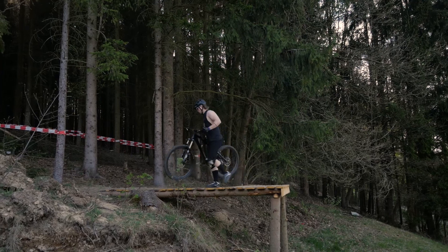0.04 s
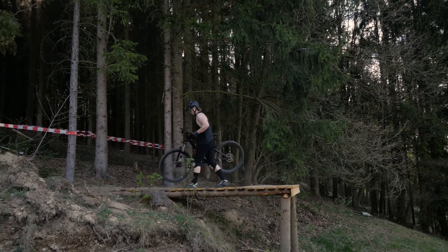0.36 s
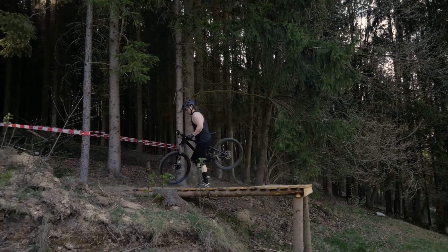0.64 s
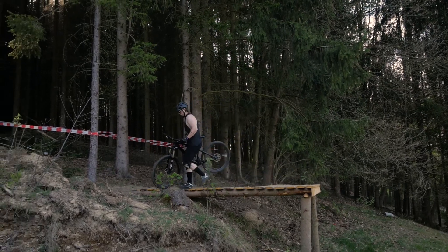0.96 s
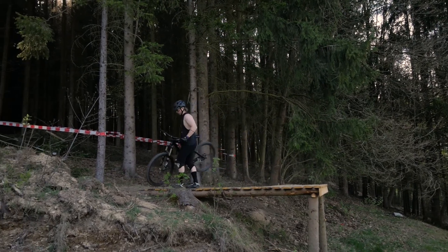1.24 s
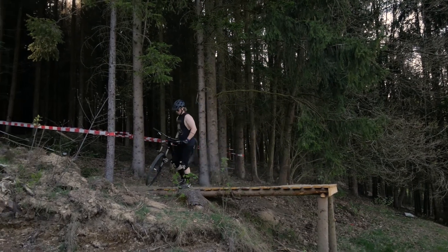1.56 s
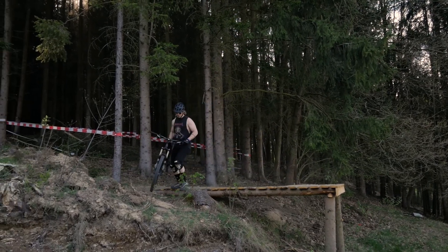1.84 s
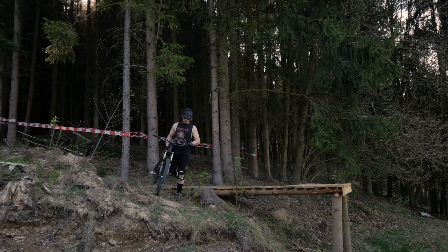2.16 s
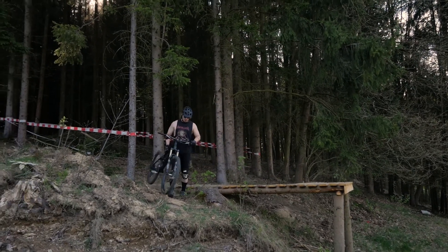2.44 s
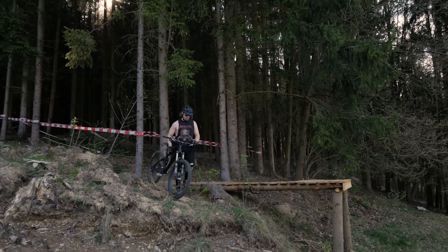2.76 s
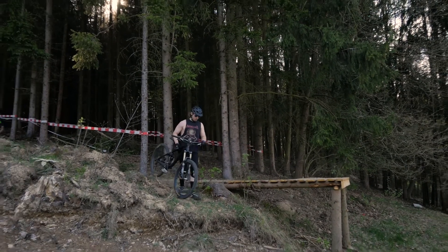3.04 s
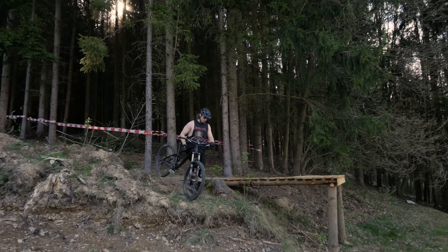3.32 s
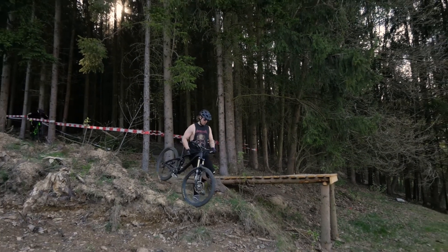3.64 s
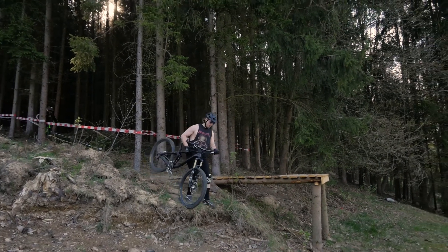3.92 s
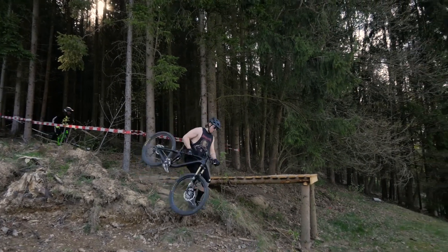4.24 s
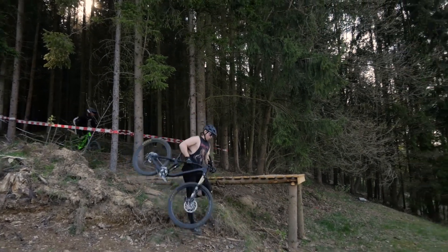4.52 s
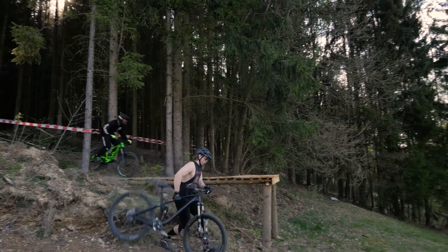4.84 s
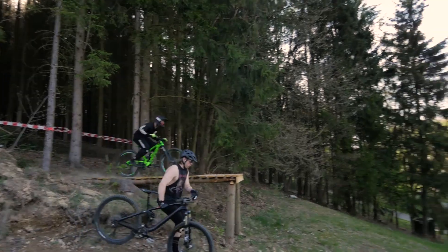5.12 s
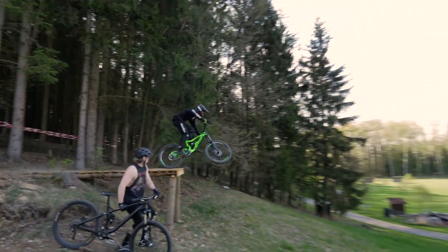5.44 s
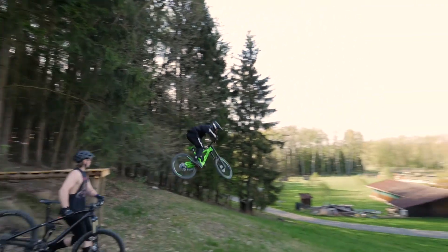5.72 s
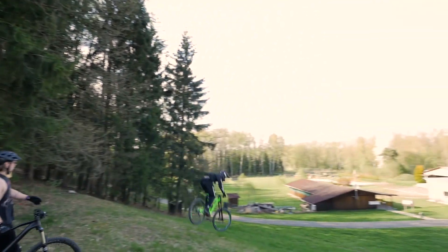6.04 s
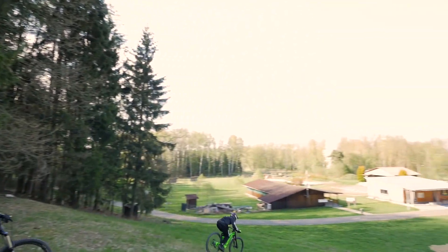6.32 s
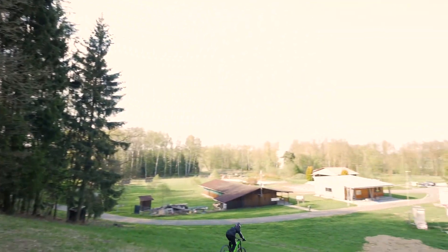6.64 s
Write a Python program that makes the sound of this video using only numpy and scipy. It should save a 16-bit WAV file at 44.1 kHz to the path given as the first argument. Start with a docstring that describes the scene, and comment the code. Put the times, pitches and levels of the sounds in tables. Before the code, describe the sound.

Faint birds whistle over a steady forest hush while shoes knock on wooden planks. A mountain bike is walked on through dry grass, clicking and rattling lightly. A second bike clatters in, drums across the hollow wooden ramp and flies off with its freewheel softly ticking. It lands on dirt with a thud and a short, loud buzz of tyre against frame, then rolls on. The bikes sound fairly near and almost dry, the birds distant.

```python
"""At a forest edge small birds whistle over a steady hush, and the trunks scatter a thin echo.
A mountain bike is walked off a wooden ramp: shoes knock on planks, the bike clicks, dry grass rustles.
A second bike rattles down the trail and, near 4.9 s, drums over the hollow deck.
It flies with its freewheel ticking and lands on dirt at 6.2 s, where a tyre buzzes briefly
against the frame as the suspension bottoms out."""
import sys
import numpy as np
from scipy import signal
from scipy.fft import rfft, irfft, next_fast_len
from scipy.io import wavfile
from scipy.ndimage import uniform_filter1d, map_coordinates

SR = 44100
rng = np.random.default_rng(int(sys.argv[2]) if len(sys.argv) > 2 else 0)


def bounce(signal):
    """Save signal as a 16-bit WAV file at the path given by the first command-line argument."""
    frames = np.transpose(np.atleast_2d(signal))
    limited = np.clip(frames, -1, 1)
    pcm = np.round(limited * 32767).astype(np.int16)
    wavfile.write(sys.argv[1], SR, pcm)


N = 303119

# Levels are mix trims; on resonances and spectra they only shape the tone.
# shoes and wheels on wood and hard ground: start_s, level_db, thump_db, brightness_hz, clatter_t60_s
KNOCKS = [(.364, -33.5, -16, 700, 0.14), (.3997, -26.5, -6.5, 1500, 0.044), (.877, -45, -2, 1410, .083),
          (.909, -37, -4, 1290, 0.099), (.932, -47, 11, 1100, .06), (1.033, -43.5, -2, 3000, .04),
          (1.3228, -28, -8.5, 1570, .075), (1.7132, -36, 0, 1770, .061), (1.794, -38, -18, 2470, 0.058),
          (2.535, -40.5, -10, 690, 0.02), (2.704, -35.5, -16, 3500, 0.2), (3.268, -48.5, 10.5, 800, .2),
          (3.603, -51, 14, 700, .06), (3.702, -48, 2, 1100, .073), (4.288, -39.5, -1, 600, .049),
          (4.339, -38, -5, 900, 0.036), (4.672, -25, 2, 704, 0.048), (4.789, -27.5, 3, 2210, 0.12),
          (4.908, -28.5, 4, 1770, 0.027), (4.94, -21, -5.5, 2000, 0.1), (4.998, -19.5, -19, 1560, 0.19),
          (5.094, -16.5, -26, 620, 0.0087), (5.387, -32, 1.5, 2200, 0.099), (5.426, -38.5, 8, 1790, .05),
          (5.538, -40.5, 8.5, 900, 0.23), (6.216, -33.5, 0, 595, 0.074), (6.227, -34, -2, 1470, 0.19),
          (6.251, -31.5, 3.5, 1390, .12)]
# chain, pedals and twigs: start_s, level_db, clack_db, t60_s
CLICKS = [(.029, -52.5, 2.5, .028), (0.787, -52, -20, .02), (.864, -53, -20, .02), (1, -44, -3, .012),
          (1.1915, -49.5, -1, 0.049), (1.791, -35, -13, 0.027), (2.3515, -48, -13, .032),
          (2.7036, -37.5, 3.5, 0.023), (2.7567, -32.5, -11, 0.014), (2.9023, -41.5, -1, .025),
          (2.9594, -36.5, -5, 0.013), (3.4573, -45, 5, 0.061), (3.6385, -38, 3, 0.0076),
          (3.7, -35.5, -1, 0.02), (3.7513, -42.5, 2, 0.043), (3.798, -48, -3, 0.022),
          (3.8524, -43.5, 2.5, .02), (3.8865, -40, -5, .047), (3.941, -36, -17, .034),
          (4.052, -37.5, -1, .006), (4.1732, -41, 3, 0.021), (4.2174, -30.5, -4, 0.0094),
          (4.247, -39.5, 1, .025), (4.3194, -41.5, 0.5, 0.052), (4.4194, -51, 9.5, 0.025),
          (4.488, -45.5, 5, 0.045), (4.653, -35, 4, 0.021), (4.6687, -29.5, -7.5, 0.072),
          (4.7457, -28.5, -18, 0.0095), (4.7924, -31, -0.5, 0.017), (4.7999, -24, -4.5, .025),
          (4.8877, -27.5, -9, .025), (4.9134, -22.5, -16, 0.013), (4.9401, -21.5, 4, 0.013),
          (4.9919, -21.5, -0.5, 0.056), (5.365, -36, 4, 0.046), (5.5653, -33, -10, .025),
          (5.727, -31.5, -18, 0.028), (6.2277, -26.5, -7, 0.071), (6.2748, -24, -2.5, 0.025),
          (6.318, -21.5, 1.5, 0.02), (6.567, -42.5, 1, .035)]
# short steel rings of the moving bike: start_s, pitch_hz, level_db, t60_s
PINGS = [(6.3, 8600, -58, 0.082), (5.333, 4170, -37, 0.065), (5.567, 2700, -45, 0.046),
         (5.65, 2560, -41, 0.037), (5.649, 3400, -44, 0.047)]
# the walked bike over the bigger bumps: start_s, level_db, length_s, brightness_hz
RATTLES = [(2.258, -50.5, .011, 1300), (2.286, -56, .04, 1400), (2.611, -53.5, 0.029, 5000),
           (2.755, -51, 0.01, 1200), (2.789, -51.5, 0.033, 2970), (3.123, -51, 0.015, 1000),
           (3.286, -47.5, 0.04, 1020), (3.326, -49.5, 0.032, 4970), (3.412, -48, .028, 2900),
           (3.633, -51, .014, 5000), (3.679, -49, 0.037, 1100), (3.747, -48.5, 0.014, 4000),
           (3.798, -49, 0.015, 6000), (3.925, -51.5, .012, 800), (4.439, -53, 0.014, 3000)]
# how hard tyres and shoes work the ground: time_s, soil_db, grass_db
GROUND_EFFORT = [(2.0, -65, -77.5), (2.6, -62, -68.5), (2.98, -61.5, -58), (3.55, -54.5, -60.5),
                 (3.8, -56.5, -56.5), (3.94, -57, -61.5), (4.64, -51, -59.5), (4.87, -43, -51),
                 (5.06, -44.5, -56), (5.19, -41, -55), (5.51, -52, -54), (6.0, -53, -55.5),
                 (6.26, -50, -60.5), (6.38, -49, -46), (6.54, -52.5, -55), (6.87, -51, -53)]
# shoes and tyres brushing dry grass: peak_s, level_db, rise_s, fall_s
SWISHES = [(2.085, -63.5, 0.024, .04), (2.15, -51.5, 0.024, 0.034), (2.92, -60, 0.021, 0.19),
           (3.925, -53.5, 0.032, 0.017), (5.385, -45, 0.016, 0.12), (5.735, -53.5, 0.039, 0.034),
           (6.05, -52.5, 0.064, .1), (6.27, -43, 0.059, 0.068)]
# a foot or wheel dropping its weight on earth: start_s, level_db, fall_s
THUDS = [(2.57, -48.5, 0.045), (2.77, -49, 0.037), (3.17, -47, 0.052), (3.35, -51, 0.091), (3.6, -53, .06),
         (3.7, -47.5, 0.1), (4.12, -52.5, 0.11), (4.5, -59, 0.051), (4.67, -45, 0.03), (6.218, -32, 0.043)]
# tyres taking the load after the landing: peak_s, level_db, rise_s, fall_s
TREAD_LOADS = [(6.35, -31.5, .004, 0.061), (6.78, -47, 0.14, 0.31)]
# bird notes: start_s, length_s, first_hz, last_hz, bend (below 1 the glide comes early), level_db
BIRD_NOTES = [(.085, 0.16, 6000, 3900, .15, -70), (.2, 0.11, 4650, 4520, 1, -75),
              (.32, 0.13, 3950, 4710, 3, -70), (0.475, 0.19, 3950, 3650, .5, -77),
              (.53, .13, 4500, 4620, .5, -81), (.79, 0.096, 4700, 3900, .4, -72),
              (.92, .09, 3000, 2780, .3, -68), (1.037, 0.077, 4350, 5280, .75, -62.5),
              (1.213, 0.18, 8000, 7100, 1, -81), (1.418, 0.072, 5300, 3800, .2, -70),
              (1.465, 0.11, 3050, 2760, .3, -70), (1.595, 0.056, 4100, 5200, .55, -61),
              (1.84, 0.061, 3650, 4200, 2, -73), (2.0, .09, 4750, 4600, .5, -73)]

# resonances of the hollow ramp: pitch_hz, width_hz, level_db
RAMP_MODES = [(66, 11, -5), (87, 23, 6.5), (156, 38, 0.5), (232, 71, -5), (253, 26, 4.5), (431, 80, 3.5),
              (530, 150, -8), (794, 96, -3), (1210, 300, -16.5), (1950, 1400, -19)]
# boom of the deck's unsupported end: pitch_hz, width_hz, level_db
SPAN_MODES = [(88.5, 22, 0), (66, 12, -8)]
# ring of a knocked plank: pitch_hz, width_hz, level_db
PLANK_MODES = [(244, 120, -6), (518, 74, -1), (707, 120, -2), (854, 92, -2.5), (1164, 520, -5.5),
               (1650, 580, -14), (2360, 110, -11), (2900, 1200, -6.5)]
# low thump of deck and packed earth: pitch_hz, width_hz, level_db
THUMP_MODES = [(89, 17, 6), (142, 69, 6.5), (254, 44, 0.5), (353, 160, -7)]
# ring of the frame under the rubbing tyre: pitch_hz, width_hz, level_db
FRAME_MODES = [(238, 42, -18), (330, 19, 6), (437, 32, 6), (652, 63, 1), (725, 68, 2), (870, 84, 1.5),
               (1090, 130, -1), (1228, 82, -1.5), (1520, 190, -3.5), (1783, 33, 4), (1900, 50, -3),
               (1970, 54, -1), (2170, 36, -13), (2440, 38, -27)]
# hollow ring of the walked bike: pitch_hz, width_hz, level_db
HOLLOW_MODES = [(795, 81, 2), (1190, 50, -2.5), (2030, 200, -10), (2726, 34, -3.5), (3016, 52, -5),
                (3800, 30, -19)]
# ring of the freewheel hub: pitch_hz, width_hz, level_db
HUB_MODES = [(5090, 410, -6), (7200, 600, -1.5), (8750, 2500, -6), (13000, 5100, 1.5)]
# drone of the rolling tyre: pitch_hz, width_hz, level_db
TREAD_MODES = [(271, 52, 1), (314, 46, -4), (460, 94, -12.5)]

# rubber rasping on the frame: frequency_hz, level_db
RASP_SPECTRUM = [(150, -22), (300, 5), (2500, -6), (4000, 10), (7000, 4), (15000, -23)]
# a small hard snap: frequency_hz, level_db
SNAP_SPECTRUM = [(2000, -21), (4000, -4.5), (5500, 2.5), (9000, -4), (12000, -6.5), (16000, 4.5)]
# scraped soil: frequency_hz, level_db
SOIL_SPECTRUM = [(120, -42), (300, 4), (500, 4.5), (800, 0.5), (1300, -2), (2200, -30), (5000, -29.5)]
# twig crunch, also the clack of a click: frequency_hz, level_db
TWIG_SPECTRUM = [(700, -7.5), (1500, 2), (2200, 0.5), (3200, -3.5), (4500, -7.5), (7000, -17), (15000, -58)]
# dry grass: frequency_hz, level_db
GRASS_SPECTRUM = [(2000, 0.5), (4000, -2), (5500, -0.5), (7000, -1), (9000, -4), (12000, -1), (16000, 3.5)]
# earth rumble and thuds: frequency_hz, level_db
EARTH_SPECTRUM = [(20, -26), (50, 7), (95, 4), (170, -4), (300, -7.5), (600, -53), (1500, -78)]
# valley hush: frequency_hz, level_db
AIR_SPECTRUM = [(20, 6), (45, -0.5), (65, -1), (110, 4.5), (200, -4), (350, -4.5), (900, -6.5), (1400, -9),
                (2800, -19), (4200, -19), (5200, -24), (9000, -34), (16000, -22.5)]
# echo decay among the trunks: frequency_hz, t60_s
FOREST_DECAY = [(100, 0.97), (400, 0.49), (1500, 0.7), (4000, 0.44), (12000, 0.078)]
# microphone tone: frequency_hz, gain_db
MIC_RESPONSE = [(20, -3.5), (6800, -0.5), (8700, 6.5), (10000, -3.5), (11500, -8), (14000, -8.5),
                (16000, -18.5)]

TOP_HZ = 15830  # band limit
TIME = np.arange(N) / SR


def deck(on_s=4.91, off_s=5.394, plank_hz=42, roar=0.53, sag_db_per_s=1):
    """Wheels slap plank after plank as the tread roars; the ramp resonates and its free end booms."""
    phase = np.cumsum(plank_hz * amp(1.5 * wobble(25))) / SR % 1
    tread = rng.standard_normal(N) * (roar + np.exp(-phase / 0.16))
    ridden_s = np.clip(TIME, on_s, off_s) - on_s
    load = amp(-35 - sag_db_per_s * ridden_s) * held(on_s, off_s, rise_s=0.027, fall_s=0.016)
    end_load = amp(-37.5) * held(5.18, off_s, rise_s=0.02, fall_s=0.016)
    drum = unit(resonate(tread, RAMP_MODES, bright_hz=2190))
    boom = unit(resonate(tread, SPAN_MODES, bright_hz=202))
    return load * drum + end_load * boom


def tyre_buzz(on_s=6.303, off_s=6.344, knob_hz=108.9, first_db=-23.5, full_db=-11, squeeze_s=0.02):
    """Tread knobs strike the frame too fast to count, ever harder until the suspension lets go."""
    slack = np.exp(-np.maximum(TIME - on_s, 0) / squeeze_s)
    press = amp(full_db + (first_db - full_db) * slack) * held(on_s, off_s, rise_s=0.0037, fall_s=0.0013)
    phase = (TIME - 6.3425) * knob_hz % 1  # one knob hits just before the release
    strikes = unit(1. * (np.diff(phase, prepend=0) < -.5))
    scuff = unit(rng.standard_normal(N) * (1 + np.exp(-phase / 0.4)))
    force = strikes + 1.28 * scuff
    ring = resonate(press * force, FRAME_MODES, bright_hz=2370)
    steady_rms = np.std(resonate(force[:SR], FRAME_MODES, bright_hz=2370))
    rasp = amp(-29) * press * coloured(scuff, RASP_SPECTRUM)
    return ring / steady_rms + rasp


def knocks(hold_s=0.0077, shake_db=-25, snap_db=-25):
    """A sole or wheel snaps down and clatters; the planks ring and shake on over a hollow thump."""
    out, t = np.zeros(N), np.arange(SR // 4) / SR
    for start_s, db, thump_db, bright_hz, t60_s in KNOCKS:
        contact, weight, sand = rng.standard_normal((3, len(t)))
        contact *= decay(t - hold_s, t60_s) + amp(shake_db) * decay(t, t60_s=0.64)
        wood = unit(resonate(contact, PLANK_MODES, bright_hz))
        thump = unit(resonate(weight * decay(t, t60_s=0.2), THUMP_MODES, bright_hz=507))
        snap = unit(coloured(sand, SNAP_SPECTRUM) * decay(t, t60_s=0.064))
        add(out, start_s, amp(db - 21) * (wood + amp(thump_db) * thump + amp(snap_db) * snap))
    return out


def clicks(hold_s=0.00085, rise_s=0.00063, rattle_db=-15):
    """Chain, pedals and twigs click: a bright snap and a lower clack, trailing into a faint rattle."""
    out, t = np.zeros(N), np.arange(SR // 5) / SR
    for start_s, db, clack_db, t60_s in CLICKS:
        snap, clack = rng.standard_normal((2, len(t)))
        scrape = coloured(snap, SNAP_SPECTRUM) + amp(clack_db) * coloured(clack, TWIG_SPECTRUM)
        fade = decay(t - hold_s, t60_s) + amp(rattle_db) * decay(t, t60_s=0.46)
        add(out, start_s, amp(db - 3.5) * attack(t, rise_s) * fade * scrape)
    return out


def pings(rise_s=0.00067):
    """Struck steel on the bike rings briefly at a single pitch."""
    out, t = np.zeros(N), np.arange(SR // 5) / SR
    for start_s, hz, db, t60_s in PINGS:
        add(out, start_s, amp(db) * attack(t, rise_s) * decay(t, t60_s) * np.sin(2 * np.pi * hz * t))
    return out


def freewheel(on_s=5.25, off_s=6.07, pawl_hz=116.2, life_s=0.0023, uneven_db=2):
    """As the rider coasts, pawls drop over the hub's teeth, each a little harder or softer."""
    since_drop_s = np.cumsum(pawl_hz * (1 + .03 * wobble(14))) / SR % 1 / pawl_hz
    drops = rng.standard_normal(N) * np.exp(-since_drop_s / life_s) * amp(uneven_db * wobble(70))
    ring = unit(resonate(drops, HUB_MODES, bright_hz=15000))
    return amp(-54.5) * held(on_s, off_s, rise_s=0.17, fall_s=0.48) * ring


def rattles(detune=0.061):
    """Loose parts chatter against the hollow frame; each bump rings it a little differently."""
    out, t = np.zeros(N), np.arange(SR // 5) / SR
    for start_s, db, length_s, bright_hz in RATTLES:
        chatter = rng.standard_normal(len(t)) * np.exp(-(t / length_s) ** 4)
        shift = np.exp(detune * rng.standard_normal())
        # a harder contact drives the high modes and leaves the low ones
        ring = filtered(chatter, lambda f: body(HOLLOW_MODES, f * shift, bright_hz) * low_cut(f, bright_hz))
        add(out, start_s, amp(db) * unit_at_loudest(ring, length_s + 0.003))
    return out


def jiggle(rate_hz=14, life_s=0.0044, level_db=-6, spread_db=3):
    """Small bumps shake the loose parts at random, more strongly on rougher ground."""
    chance, size, chatter = rng.random(N), rng.standard_normal(N), rng.standard_normal(N)
    bumps = (chance < rate_hz / SR) * amp(spread_db * np.clip(size, -1, 1))
    chatter *= with_tails(bumps, life_s)
    ring = unit(filtered(chatter, lambda f: body(HOLLOW_MODES, f, bright_hz=4020) * low_cut(f, 2500)))
    soil, grass = ground_gains()
    return amp(level_db) * np.sqrt(soil * grass) * ring


def ground(soil_db=-0.5, twig_db=-2.5, grass_db=3.5, twigs_in_grass=0.33):
    """Tyres and shoes scrape soil and crush twigs and dry grass in uneven clumps."""
    soil, grass = ground_gains()
    clumps = wobble(45)
    twigs = grass ** twigs_in_grass * soil ** (1 - twigs_in_grass)
    for peak_s, db, rise_s, fall_s in SWISHES:
        width_s = np.where(TIME < peak_s, rise_s, fall_s)
        grass = grass + amp(db) * np.exp(-((TIME - peak_s) / width_s) ** 2)
    rustle = coloured(grit(rate_hz=1200, spread_db=4, share=0.5), GRASS_SPECTRUM)
    scrape = coloured(grit(rate_hz=220, spread_db=2, share=0.25), SOIL_SPECTRUM)
    crunch = coloured(grit(rate_hz=330, spread_db=5, share=0.38), TWIG_SPECTRUM)
    return (soil * scrape * amp(soil_db + 1.4 * clumps)
            + twigs * crunch * amp(twig_db + 2.26 * clumps)
            + grass * rustle * amp(grass_db + 1.8 * clumps))


def grit(rate_hz, spread_db, share):
    """Tiny fractures of scattered size make up a share of a smooth hiss."""
    hiss, chance, size = rng.standard_normal(N), rng.random(N), rng.standard_normal(N)
    snaps = (chance < rate_hz / SR) * amp(spread_db * np.clip(size, -2, 2))
    crackle = unit(with_tails(snaps, life_s=0.00059))
    return hiss * np.sqrt(1 - share + share * crackle ** 2)


def stalk_ticks(rate_hz=40, life_s=0.0014, level_db=8, spread_db=3, centre_hz=5200, octaves=0.87):
    """Dry stalks and grit snap at random, each at its own pitch, louder where bikes stir the grass."""
    out, t = np.zeros(N), np.arange(SR // 50) / SR
    _, grass = ground_gains()
    chance, size, pitch = rng.random(N), rng.standard_normal(N), rng.standard_normal(N)
    hiss = rng.standard_normal(N + len(t))
    for i in np.flatnonzero(chance < rate_hz / SR):
        hz = min(centre_hz * 2 ** (octaves * pitch[i]), TOP_HZ)
        burst = hiss[i:i + len(t)] * np.exp(-t / life_s)
        snap = resonate(burst, [(hz, 0.54 * hz, 0)], TOP_HZ)
        gain = grass[i] * amp(level_db + spread_db * np.clip(size[i], -2, 1))
        add(out, i / SR, gain * unit_at_loudest(snap, life_s))
    return out


def earth(rumble_db=-59.5, thud_rise_s=0.0048):
    """The earth rumbles with the rolling and thuds under each weight; loaded tyres drone on it."""
    soil, _ = ground_gains()
    rolling = amp(rumble_db) * soil / np.median(soil)
    thuds = sum(amp(db) * held(s, s + thud_rise_s, thud_rise_s, fall_s) for s, db, fall_s in THUDS)
    bumps = amp(1.5 * wobble(22))
    load = sum(amp(db) * held(s, s, rise_s, fall_s) for s, db, rise_s, fall_s in TREAD_LOADS)
    drone = unit(resonate(rng.standard_normal(N), TREAD_MODES, bright_hz=600))
    rumble = coloured(rng.standard_normal(N), EARTH_SPECTRUM)
    return (rolling + thuds) * bumps * rumble + load * drone


def birds(waver=0.0139, taper=0.35):
    """Distant thin whistles: each swells, glides from one pitch to another, wavers and fades."""
    out, drift = np.zeros(N), 1 + waver * wobble(160)
    for start_s, length_s, first_hz, last_hz, bend, db in BIRD_NOTES:
        progress = np.linspace(0, 1, int(length_s * SR))
        glide_hz = first_hz + (last_hz - first_hz) * progress ** bend
        hz = glide_hz * drift[round(start_s * SR):][:len(progress)]
        whistle = np.sin(2 * np.pi * np.cumsum(hz) / SR)
        add(out, start_s, amp(db) * signal.windows.tukey(len(whistle), taper) * whistle)
    return out


def forest_echo(send, rise_s=0.0021):
    """Trunks scatter a thin tail in which each frequency dies at its own speed."""
    hz, t, bands = signal.stft(rng.standard_normal(SR), SR, nperseg=256)
    bands *= attack(t, rise_s) * decay(t, along(FOREST_DECAY, hz)[:, None])
    _, tail = signal.istft(bands, SR, nperseg=256)
    return signal.fftconvolve(send, tail / np.linalg.norm(tail))[:N]


def air():
    """The steady hush of the valley and trees."""
    level_db = np.interp(TIME, [0, .7, 1.9, 3], [-55.0, -56.5, -57, -55.5])
    return amp(level_db + 0.068 * wobble(6.35)) * coloured(rng.standard_normal(N), AIR_SPECTRUM)


def ground_gains():
    """Fader curves for soil and grass, closed before the first cue and after the last."""
    s, *levels_db = np.transpose(GROUND_EFFORT)
    cues_s = np.r_[s[0] - .02, s, s[-1] + .04]
    return [amp(np.interp(TIME, cues_s, np.r_[-100, db, -100])) for db in levels_db]


def held(on_s, off_s, rise_s, fall_s):
    """An envelope that swells up to on_s, holds, and dies away from off_s."""
    return np.exp(np.minimum(TIME - on_s, 0) / rise_s - np.maximum(TIME - off_s, 0) / fall_s)


def attack(t, rise_s):
    """A fade-in that softens an onset."""
    return 1 - np.exp(-t / rise_s)


def decay(t, t60_s):
    """Full level until t = 0, then down 60 dB every t60_s."""
    return amp(-60 * np.maximum(t, 0) / t60_s)


def with_tails(impulses, life_s):
    """Each impulse gets an exponential release."""
    return signal.lfilter([1], [1, -np.exp(-1 / (life_s * SR))], impulses)


def wobble(rate_hz):
    """A smooth random curve through rate_hz points a second."""
    knots = rng.standard_normal(int(N * rate_hz / SR) + 4)
    return map_coordinates(knots, [TIME * rate_hz])


def body(modes, f, bright_hz):
    """The response of a set of resonances to a contact that is soft above bright_hz."""
    ring = sum(amp(db) * 1j * f * width / (hz * hz - f * f + 1j * f * width) for hz, width, db in modes)
    return ring / np.sqrt(1 + (f / bright_hz) ** 6)


def resonate(x, modes, bright_hz):
    """x played through a resonant body."""
    return filtered(x, lambda f: body(modes, f, bright_hz))


def low_cut(f, corner_hz):
    """A gentle bass roll-off."""
    return f / np.hypot(f, corner_hz)


def coloured(x, spectrum):
    """x shaped by an EQ curve, at rms 1."""
    return unit(filtered(x, lambda hz: amp(along(spectrum, hz))))


def filtered(x, response):
    """x through a complex frequency response."""
    size = next_fast_len(len(x) + 8192)
    return irfft(rfft(x, size) * response(np.fft.rfftfreq(size, 1 / SR)), size)[:len(x)]


def along(points, hz):
    """A curve read on a log frequency axis."""
    points_hz, values = np.transpose(points)
    return np.interp(np.log(hz + 1), np.log(points_hz + 1), values)


def amp(db):
    """Decibels to gain."""
    return 10 ** (np.asarray(db) / 20)


def unit(x):
    """Scaled to rms 1."""
    return x / np.sqrt(np.mean(x ** 2) + 1e-20)


def unit_at_loudest(x, span_s):
    """Scaled to rms 1 over its loudest span."""
    power = uniform_filter1d(x ** 2, max(int(span_s * SR), 1))
    return x / np.sqrt(np.max(power) + 1e-20)


def add(track, start_s, x):
    """Mix x into the track from start_s."""
    part = track[max(round(start_s * SR), 0):][:len(x)]
    part += x[:len(part)]


def scene(tree_line_s=0.085):
    """Near sounds are almost dry, birds sit deep in the trees, the buzz slaps back off the tree line."""
    hits = knocks() + rattles() + jiggle() + clicks() + pings() + deck() + freewheel()
    song, buzz = birds(), tyre_buzz()
    slapback = np.zeros(N)
    add(slapback, tree_line_s, resonate(buzz, [(1740, 500, 0.0046)], bright_hz=2600))
    send = amp(-20.5) * hits + amp(-4.5) * song + amp(-24.5) * buzz + amp(-21.5) * slapback
    return (hits + song + buzz + forest_echo(send) + ground() + earth() + stalk_ticks() + air())[None]


def record(dry):
    """The microphone port has a treble resonance; nothing is kept above the band limit."""
    return np.array([filtered(x, lambda hz: amp(along(MIC_RESPONSE, hz)) * (hz < TOP_HZ)) for x in dry])


dry = scene()
out = record(dry)
bounce(out)
```